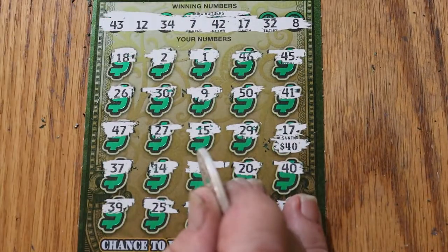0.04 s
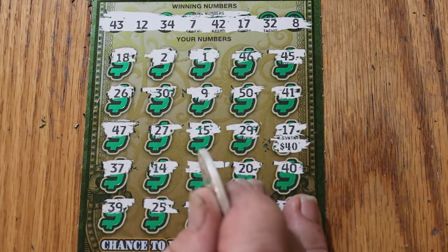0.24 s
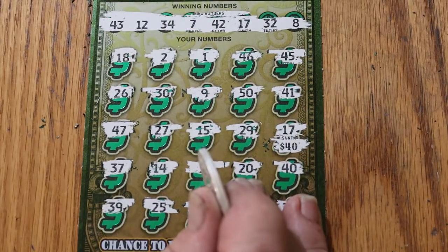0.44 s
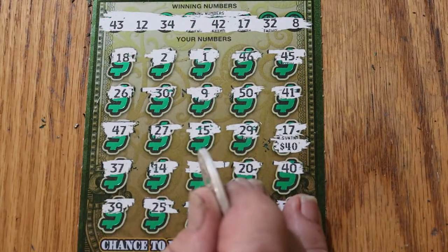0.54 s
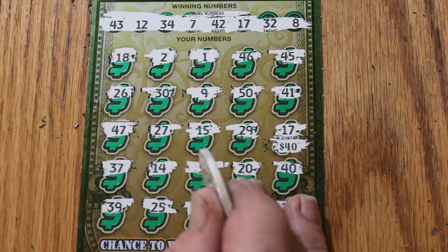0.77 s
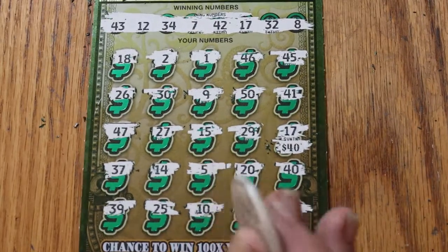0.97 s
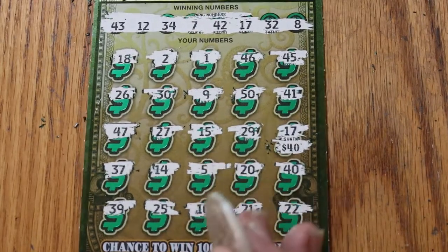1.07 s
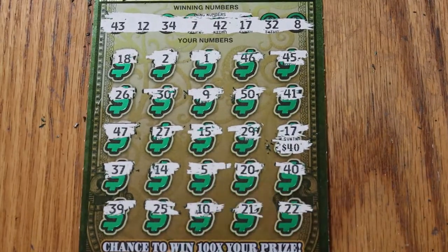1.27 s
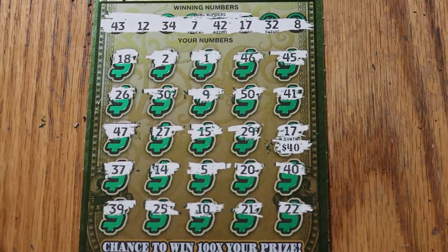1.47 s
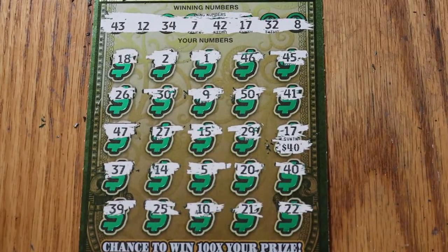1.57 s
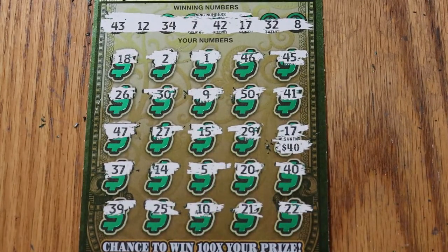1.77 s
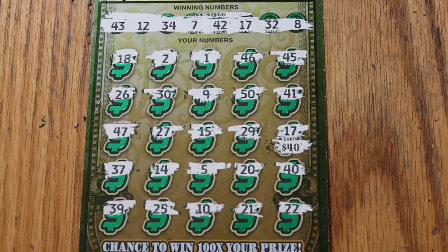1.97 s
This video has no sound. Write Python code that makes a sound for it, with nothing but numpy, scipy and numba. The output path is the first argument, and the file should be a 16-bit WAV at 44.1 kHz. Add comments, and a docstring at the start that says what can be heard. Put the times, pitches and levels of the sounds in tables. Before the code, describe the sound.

A metal coin rings from a knock just before the start, hits the wooden table again sharply at about half a second, then rings on, beating and fading, with faint finger taps in a quiet room, close stereo.

```python
"""First comes a metallic ring already sounding, from a knock just before the start; a second knock falls at 0.57 s.
A small bell-like metal body stands on a wooden table: its ring is close pairs of sines that beat as they fade.
Short modes and shaped noise make the blows and the table's thump; dulled table noise makes the finger taps.
Behind them lie a quiet room's tone, a treble hiss and faint ticks, all as noise.
Two spaced microphones feed a limiter that ducks after the blows and lets the ring swell back."""
import sys
import numpy as np
from scipy import signal
from scipy.fft import rfft, irfft, next_fast_len
from scipy.io import wavfile
from scipy.ndimage import minimum_filter1d
from numba import njit

SR = 44100
rng = np.random.default_rng(int(sys.argv[2]) if len(sys.argv) > 2 else 0)


def digitize_waveform(pressure):
    """Quantize a signal to 16-bit integers and store it at the path in sys.argv[1].

    Rows of a 2-D input are taken as channels; values are limited to [-1, 1].
    """
    field = np.atleast_2d(pressure).T
    bounded = np.clip(field, -1, 1)
    quanta = np.round(bounded * 32767).astype(np.int16)
    wavfile.write(sys.argv[1], SR, quanta)


N = 88685
T = np.arange(N) / SR


def amp(db):
    """Amplitude factor of a level in dB."""
    return 10 ** (np.asarray(db) / 20)


def unit(x):
    """x scaled to rms 1."""
    return x / np.sqrt(np.mean(x ** 2) + 1e-20)


def along(points, hz):
    """Values read between (frequency [Hz], value) points on a log axis."""
    f, v = np.transpose(points)
    return np.interp(np.log(hz + 1), np.log(f + 1), v)


def filtered(x, response):
    """x multiplied in the spectrum by a response of frequency."""
    n = x.shape[-1]
    m = next_fast_len(n + 8192)
    spectrum = rfft(x, m) * response(np.fft.rfftfreq(m, 1 / SR))
    return irfft(spectrum, m)[..., :n]


def rush(n, spectrum, alike):
    """Stereo noise of rms 1; the mid-to-side balance sets how alike the microphones are in each band."""
    def mid_side_gain(hz):
        angle = np.arccos(np.clip(along(alike, hz), -1, 1)) / 2
        return amp(along(spectrum, hz)) * [np.cos(angle), np.sin(angle)]

    mid, side = filtered(rng.standard_normal((2, n)), mid_side_gain)
    return unit(np.array([mid + side, mid - side]))


def add(out, s, x):
    """Mix x in at time s."""
    i = round(s * SR)
    out[:, i:i + x.shape[1]] += x[:, :N - i]


SWELL_S = 0.0006  # time constant of a partial's onset


def partial(t, hz, db, t60, pan_db, lead, cycle):
    """One fading sine, differing in level and phase between the two microphones."""
    half = np.array([[.5], [-.5]])  # left, right
    level = amp(db + half * pan_db - 60 * t / t60)
    onset = 1 - np.exp(-t / SWELL_S)
    return level * onset * np.sin(2 * np.pi * (hz * t + cycle + half * lead))


# When the blows start their rings; the first contact itself lies just before: (time [s])
BLOWS = [0, .5719]
# Long partials of the ring, modes and their combination tones, the louder of each pair: (frequency [Hz])
RING_HZ = [915.41, 1826.9, 2403.67, 3317.1, 4446.42, 6982.66, 9386.5, 9983.72, 13402]
# How far the twin of each long partial lies from it: (offset [Hz])
SPLIT_HZ = [-2.03, -1.1, 2.95, 3.15, -3.69, 1.7, 2.9, -6.41, -5.56]
# Fading of each long partial: (t60 [s], left over right [dB], left lead [cycles],
# level after blow 1 [dB], level after blow 2 [dB])
RING = [(54, -4.5, -0.028, -46, -41.5), (12, 7.5, -.05, -51.5, -54), (40.7, 4.5, 0.15, -22, -27.5),
        (5.4, 7.5, 0.43, -41, -49), (5.13, 2.5, 0.4, -12, -19.5), (1.94, 0.5, 0.3, -13, -10),
        (0.53, 5, .48, -30, -56), (0.64, 2, 0.4785, -5, 8), (0.36, -3, .53, -10, 0.5)]
# The twins: (t60 [s], left over right [dB], left lead [cycles], level after blow 1 [dB], after blow 2 [dB],
# beat offset at the left microphone at blow 1 [cycles], at blow 2 [cycles])
TWINS = [(74, -4, -0.36, -52, -43, -0.68, -0.25), (20, 8.5, 0.51, -65.5, -72.5, -0.19, 0.56),
         (5, 12.5, -0.11, -33, -31.5, 0.14, -0.025), (2.9, -3.5, .08, -49.5, -53, .19, 0.062),
         (4.97, 4.5, 0.43, -26.5, -24.5, -.36, -0.49), (2.71, 0, 0.26, -26.5, -26, -0.33, -0.25),
         (1.3, -1.5, 0.43, -46, -50.5, .1, .1), (0.69, -1, 0.455, -12.5, -3, -0.034, -0.48),
         (0.44, 3.5, .57, -25, -11.5, .07, .51)]


def ring():
    """Each blow sets all pairs ringing anew; the members of a pair drift apart and beat."""
    out = np.zeros((2, N))
    ends = BLOWS[1:] + [N / SR]
    for k, (start, end) in enumerate(zip(BLOWS, ends)):
        t = T[:round(end * SR) - round(start * SR)]
        for hz, split, loud, twin in zip(RING_HZ, SPLIT_HZ, RING, TWINS):
            t60, pan, lead, *db = loud
            twin_t60, twin_pan, twin_lead, *twin_rest = twin
            twin_db, beat_offset = twin_rest[:2], twin_rest[2:]
            cycle = rng.random()
            # the lead terms line the pair up at the left microphone
            twin_cycle = cycle + beat_offset[k] + (lead - twin_lead) / 2
            first_of_pair = partial(t, hz, db[k], t60, pan, lead, cycle)
            second_of_pair = partial(t, hz + split, twin_db[k], twin_t60, twin_pan, twin_lead, twin_cycle)
            add(out, start, first_of_pair + second_of_pair)
    return out


# Short modes of the metal body: (frequency [Hz])
CLANG_HZ = [415, 3002, 3419, 3564, 3802, 5103, 6562, 7278, 8398, 10690]
# Fading of each short mode: (level at the second blow [dB], t60 [s], left lead [cycles])
CLANG = [(-24, .15, 0.13), (-13, 0.36, 0.41), (3, 0.21, 0.34), (-12.5, .12, 0.24), (-6.5, 0.15, 0.56),
         (-17.5, 0.21, 0.52), (-9.5, 0.31, 0.4), (-0.5, 0.028, 0.53), (-4, 0.039, .5), (-15.5, 0.098, 0.68)]
FIRST_CLANG_DB = -25  # what is left of the first blow at the start, against the second


def clang(start, blow_db):
    """The metal's short modes, struck together."""
    out, t = np.zeros((2, N)), T[:SR // 2]
    for hz, (db, t60, lead) in zip(CLANG_HZ, CLANG):
        add(out, start, partial(t, hz, db + blow_db, t60, 0, lead, rng.random()))
    return out


LEAD_IN_S, LEAD_IN_DB = .007, -26
CRACK_DB, CRACK_T60_S = -5, .015
# Height of the low push at the left and right microphone: (scale [dB])
PUSH_DB = [
    [11.5],
    [10],
]
# time scale and delay of the push: shorter and sooner on the left
PUSH_S, PUSH_LATE_S = np.array([[.00026], [.0005]]), np.array([[.0004], [.0006]])


def contact(start):
    """A scrape just before the contact, then a bright crack of noise and a brief low push."""
    out, t = np.zeros((2, N)), T[:SR // 2]
    bright = rush(len(t), [(300, 11.5), (2000, 0), (12000, -7.5), (15500, -0.5)], WOOD_ALIKE)
    add(out, start, amp(CRACK_DB - 60 * t / CRACK_T60_S) * bright)
    scrape_spectrum = [(150, -21), (1000, 6.5), (2500, 8.5), (8000, -2.5), (15000, -17.5)]
    scrape = rush(len(t), scrape_spectrum, WOOD_ALIKE)
    add(out, start - LEAD_IN_S, amp(LEAD_IN_DB) * (t < LEAD_IN_S) * scrape)
    u = np.maximum(t - PUSH_LATE_S, 0) / PUSH_S
    add(out, start, amp(PUSH_DB) * u * (2 - u / 2) * np.exp(-u))
    return out


# Spectrum of the table's noise before it fades: (frequency [Hz], relative level [dB])
WOOD = [(50, -22), (100, 0), (250, -5.5), (500, -2.5), (1100, -3), (2500, -10), (5000, -23.5), (10000, -26),
        (15000, -44)]
# Fading of the table at full length; each use takes a share of it: (frequency [Hz], t60 [s])
WOOD_T60 = [(60, 0.24), (160, 0.043), (420, 0.032), (1100, 0.11), (3000, 0.11), (6000, 0.21), (15000, 0.12)]
# How alike the table sounds at the two microphones: (frequency [Hz], left-right likeness [-1 to 1])
WOOD_ALIKE = [(60, 0.52), (130, 1), (290, 0.91), (1400, 0.6), (3100, 1), (7000, 1)]


def wood(t60_share):
    """The table's answer: noise that dies band by band."""
    hz, t, bands = signal.stft(rush(SR // 2, WOOD, WOOD_ALIKE), SR, nperseg=128)
    t60 = t60_share * along(WOOD_T60, hz)[:, None]
    x = signal.istft(bands * amp(-60 * t / t60), SR, nperseg=128)[1]
    return x * np.minimum(np.arange(x.shape[1]) / 20, 1)  # a 20-sample fade-in


WOOD_DB, FIRST_KNOCK_DB = -2.5, -21  # the second is what is left of the first blow's table and echo noise
ECHO_DB, ECHO_T60_S = -21.5, 0.34
# Spectrum of the room's answer to the knock: (frequency [Hz], relative level [dB])
ECHO = [(150, -30), (500, -3), (1500, 2), (3500, -4), (5000, -26), (7000, -62)]


def knocks():
    """Both blows excite metal, table and room; the contact itself is heard only at the second."""
    out, t = np.zeros((2, N)), T[:SR // 2]
    for start, clang_db, knock_db in zip(BLOWS, [FIRST_CLANG_DB, 0], [FIRST_KNOCK_DB, 0]):
        out += clang(start, clang_db)
        add(out, start, amp(knock_db + WOOD_DB) * wood(0.8))
        echo_level = amp(knock_db + ECHO_DB - 60 * t / ECHO_T60_S)
        add(out, start, echo_level * rush(len(t), ECHO, AIR_ALIKE))
    return out + contact(BLOWS[1])


# Fingers on the table: (time [s], level before dulling [dB], dull above [Hz])
TAPS = [(0.867, -41, 930), (1.667, -38.5, 900), (1.974, -37, 875), (2.003, -27, 850)]


def taps():
    """Soft fingertips: short thuds of the table, dulled by a two-pole low-pass."""
    out = np.zeros((2, N))
    for start, db, dull_hz in TAPS:
        thud = filtered(wood(1), lambda hz: 1 / (1 + 1j * hz / dull_hz) ** 2)
        add(out, start, amp(db) * thud)
    return out


# Spectrum of the room tone: (frequency [Hz], relative level [dB])
AIR = [(25, -10.5), (58, -1.5), (100, -12.5), (250, -12.5), (600, -14.5), (1400, -13), (3000, -17.5),
       (4800, -25.5), (5500, -37), (15000, -49.5)]
# How alike room tone, hiss and echo are at the two microphones: (frequency [Hz], left-right likeness [-1 to 1])
AIR_ALIKE = [(60, 1), (130, 0.36), (600, -0.1), (3000, -0.78), (15000, 1)]
# Course of the room tone: (time [s], level [dB])
AIR_LEVEL = [(0, -45.5), (.3, -54.5), (.8, -55.5), (1.15, -58.5), (1.35, -52.5), (2.01, -53.5)]
# Course of the treble hiss: (time [s], level [dB])
HISS = [(1.3, -100), (1.5, -96.5), (1.7, -80.5), (1.85, -67.5), (2.01, -78)]
TICK_PER_S, TICK_AT_S, TICK_DB = 10, 1.041, -71.5  # rate, time of the first tick, level at its peak
TICK_S = .004  # standard deviation of a tick's bell-shaped course


def room():
    """Room tone and a faint treble hiss as noise of changing level, the hiss swelling late, with even ticks."""
    cycle = ((T - TICK_AT_S) * TICK_PER_S + .5) % 1 - .5
    tick_shape = np.exp(-.5 * (cycle / TICK_PER_S / TICK_S) ** 2)
    ticks = amp(TICK_DB) * (T > TICK_AT_S - .05) * tick_shape
    hiss = rush(N, [(6000, -57.5), (8500, -7.5), (11000, -0.5), (13500, -9), (15000, -33)], AIR_ALIKE)
    hiss_level = amp(np.interp(T, *np.transpose(HISS)))
    air_level = amp(np.interp(T, *np.transpose(AIR_LEVEL)))
    return air_level * rush(N, AIR, AIR_ALIKE) + (hiss_level + ticks) * hiss


def scene():
    """Everything that reaches the two microphones."""
    return ring() + knocks() + taps() + room()


@njit
def follow(need_db, attack, release_db, start_db):
    """Gain falls quickly to what is needed and climbs back at a fixed rate in dB."""
    gain, out = start_db, np.empty_like(need_db)
    for i in range(len(need_db)):
        if need_db[i] < gain:
            gain = gain + (need_db[i] - gain) * attack
        else:
            gain = min(need_db[i], gain + release_db)
        out[i] = gain
    return out


CEILING_DB, DEPTH_DB, START_DB = -5, -16, -11  # level held to, lowest gain, gain at the start
ATTACK_S, HOLD_S, RELEASE_DB_PER_S = 0.0017, .004, 146
CLIP_HARD, CLIP_TOP = 14, .93  # sharpness of the clipping knee, bound before the band limit
LOW_CUT_HZ, TOP_HZ, EDGE_HZ = 45, 15640, 250  # the treble fades out over EDGE_HZ below TOP_HZ


def band_limit(hz):
    """A two-pole low cut and a steep upper edge."""
    upper_edge = np.sin(np.pi / 2 * np.clip((TOP_HZ - hz) / EDGE_HZ, 0, 1)) ** 2
    return upper_edge * (1j * hz / (LOW_CUT_HZ + 1j * hz)) ** 2


def record(dry):
    """A limiter linked across both microphones, clipping of what slips past it, and the band limit."""
    peak_db = 20 * np.log10(np.abs(dry).max(0) + 1e-9)
    need = np.clip(CEILING_DB - peak_db, DEPTH_DB, 0)
    hold = max(int(HOLD_S * SR) // 2 * 2 + 1, 3)  # samples, odd
    need = minimum_filter1d(need, hold, origin=hold // 2)
    gain_db = follow(need, 1 / (ATTACK_S * SR + 1), RELEASE_DB_PER_S / SR, float(START_DB))
    x = dry * amp(gain_db)
    x = x / (1 + np.abs(x / CLIP_TOP) ** CLIP_HARD) ** (1 / CLIP_HARD)
    return filtered(x, band_limit)


dry = scene()
out = record(dry)
digitize_waveform(out)
```